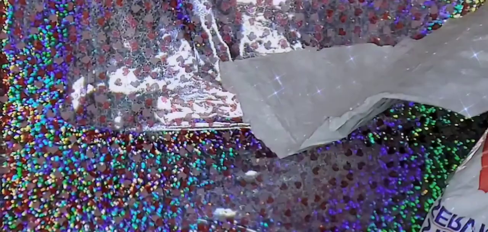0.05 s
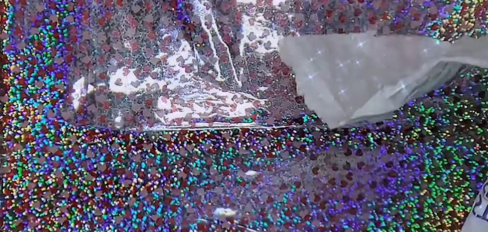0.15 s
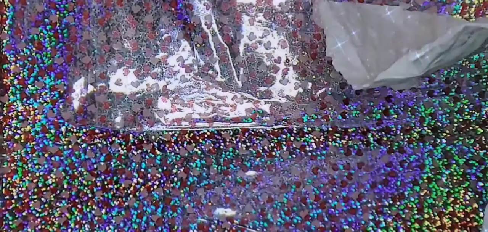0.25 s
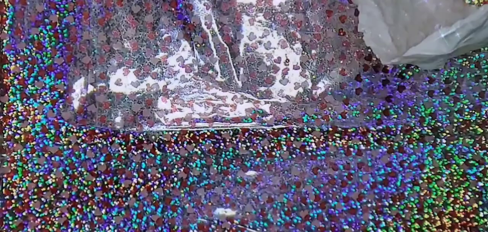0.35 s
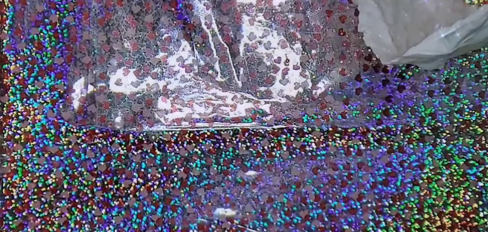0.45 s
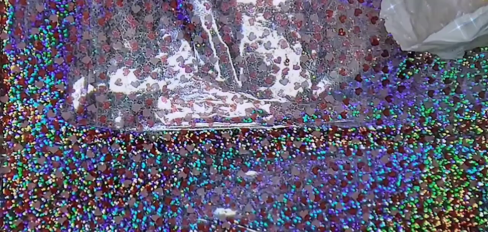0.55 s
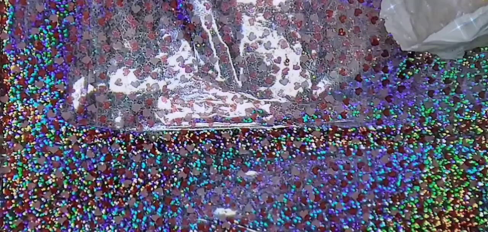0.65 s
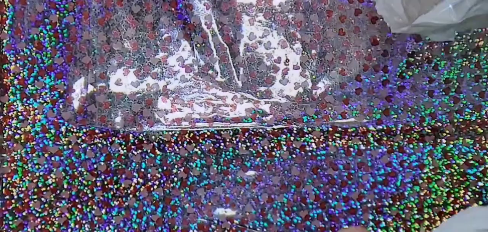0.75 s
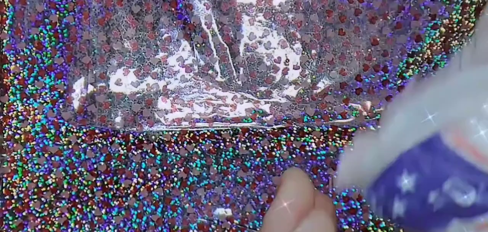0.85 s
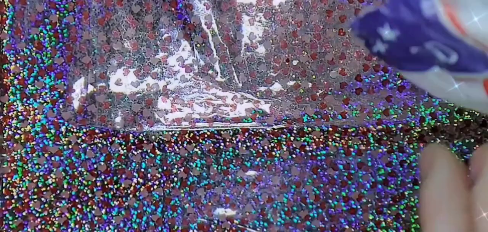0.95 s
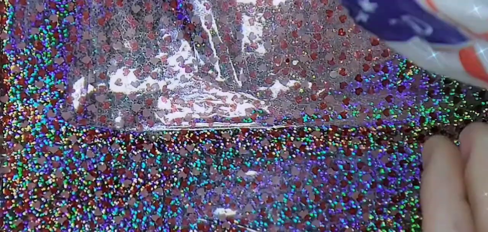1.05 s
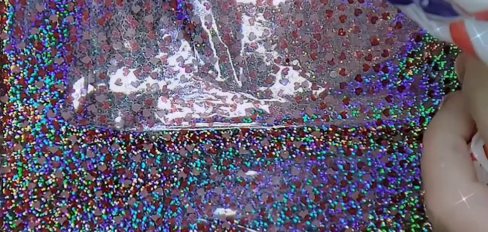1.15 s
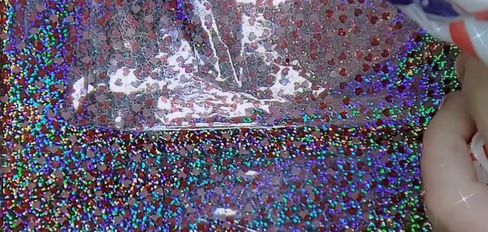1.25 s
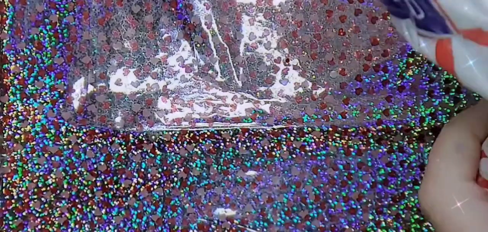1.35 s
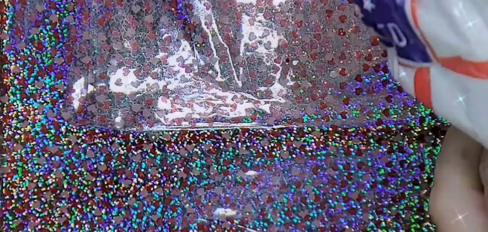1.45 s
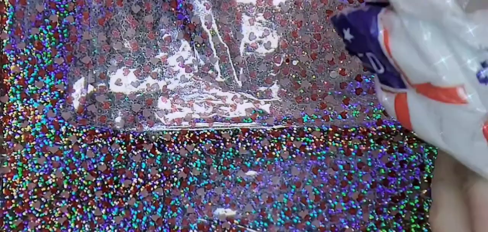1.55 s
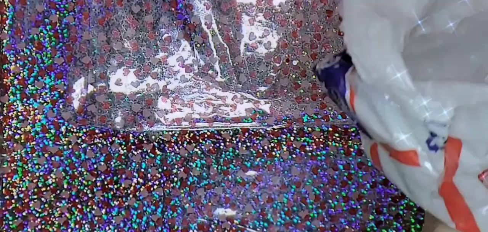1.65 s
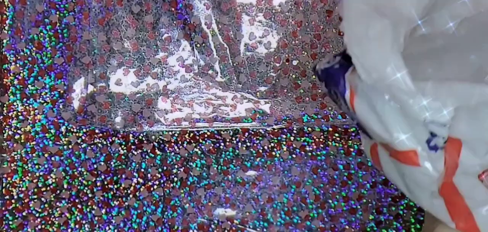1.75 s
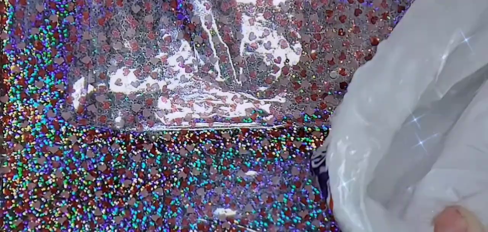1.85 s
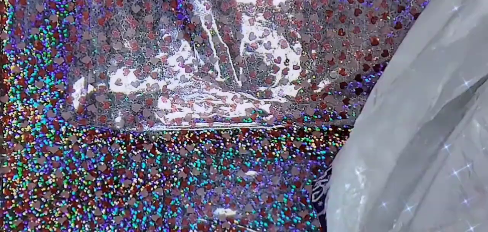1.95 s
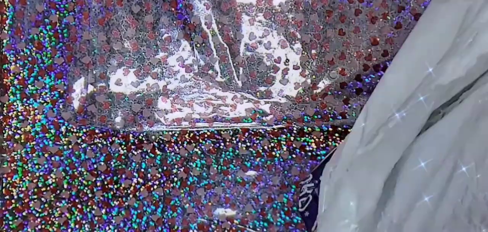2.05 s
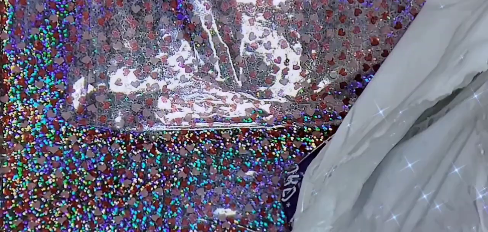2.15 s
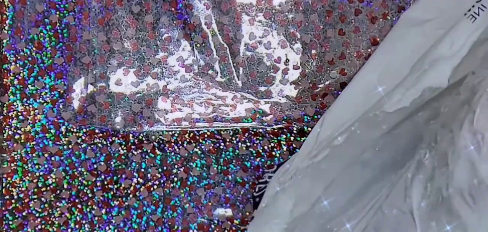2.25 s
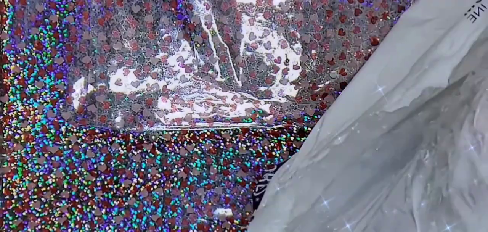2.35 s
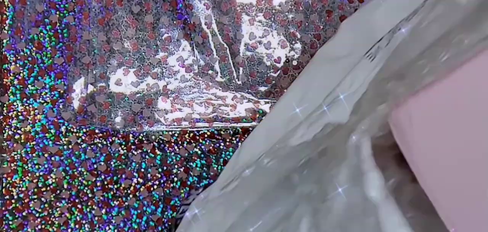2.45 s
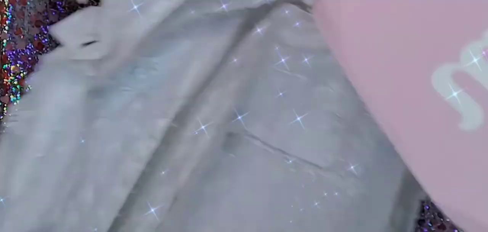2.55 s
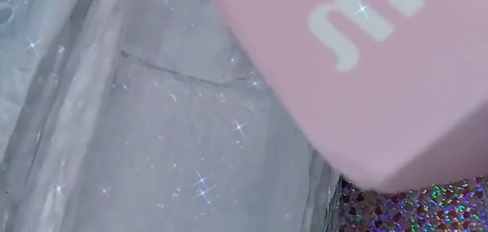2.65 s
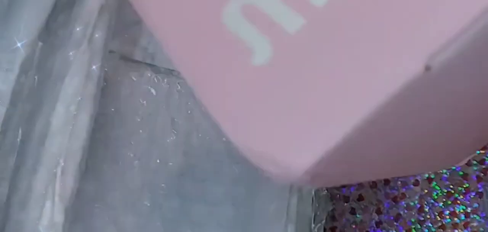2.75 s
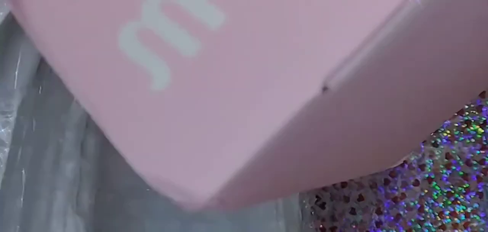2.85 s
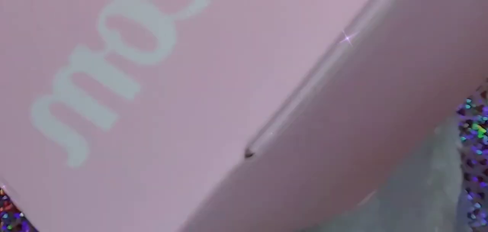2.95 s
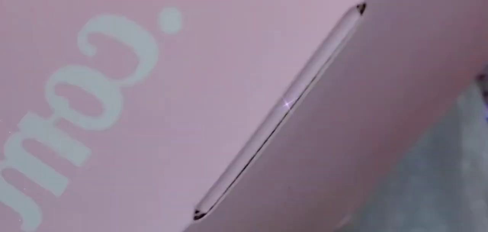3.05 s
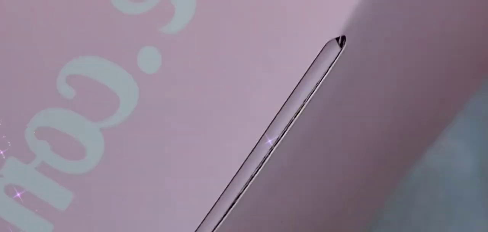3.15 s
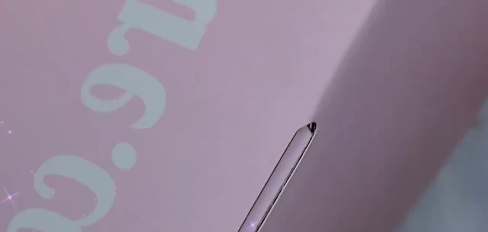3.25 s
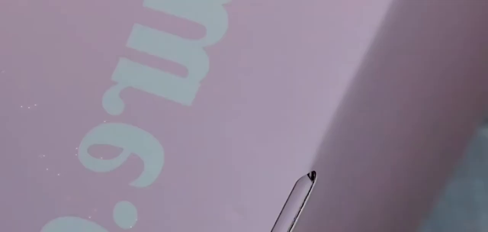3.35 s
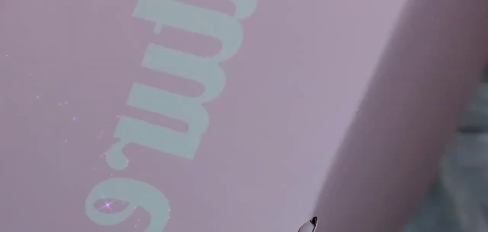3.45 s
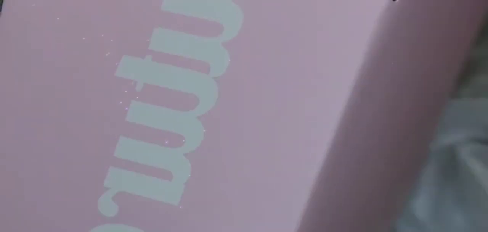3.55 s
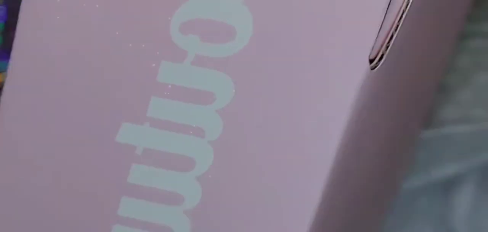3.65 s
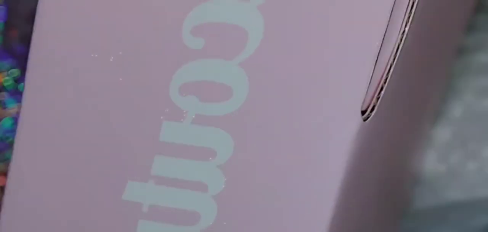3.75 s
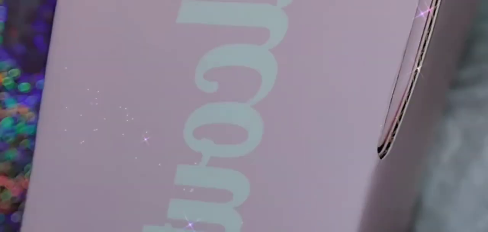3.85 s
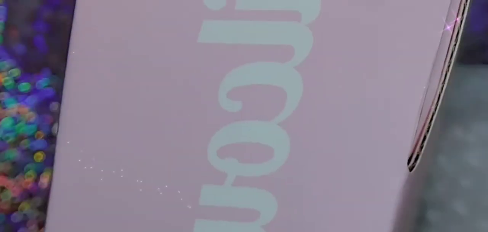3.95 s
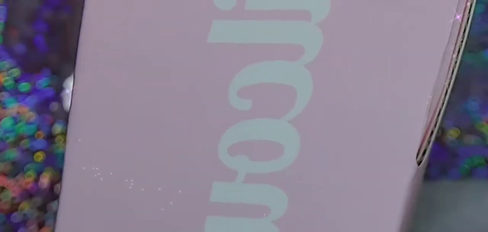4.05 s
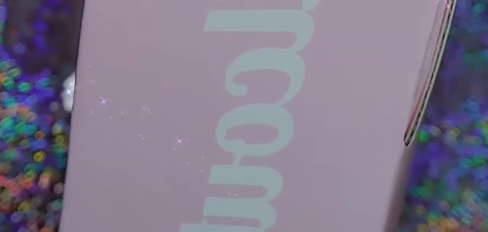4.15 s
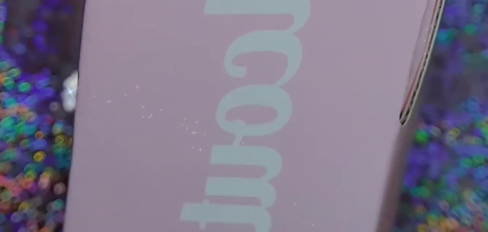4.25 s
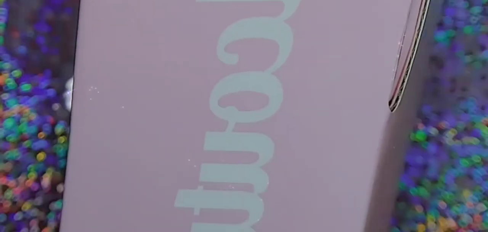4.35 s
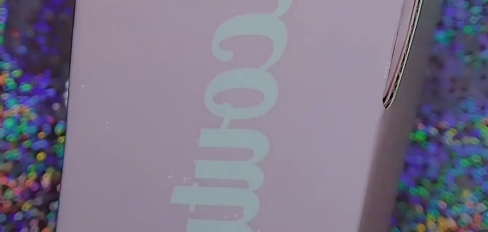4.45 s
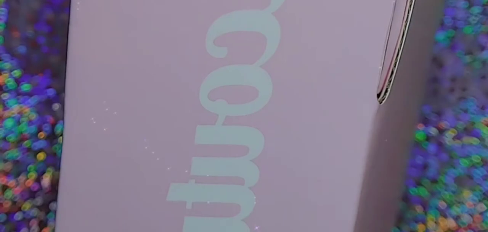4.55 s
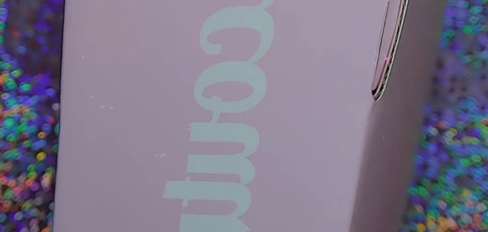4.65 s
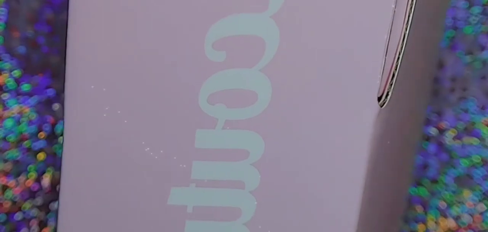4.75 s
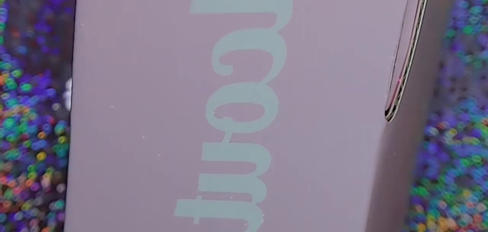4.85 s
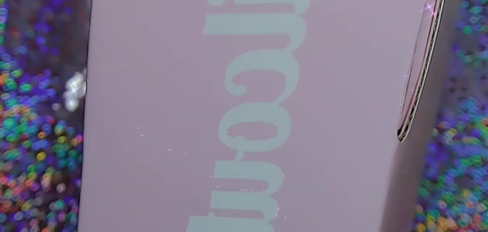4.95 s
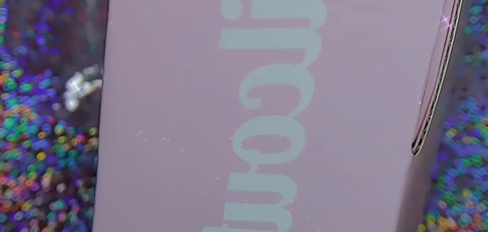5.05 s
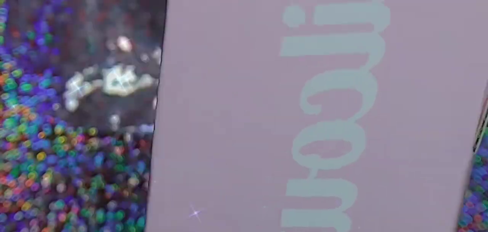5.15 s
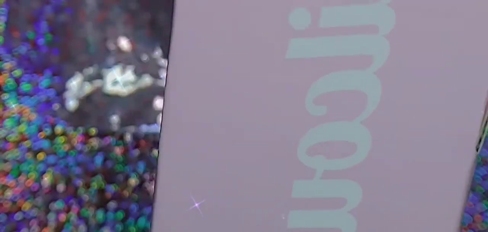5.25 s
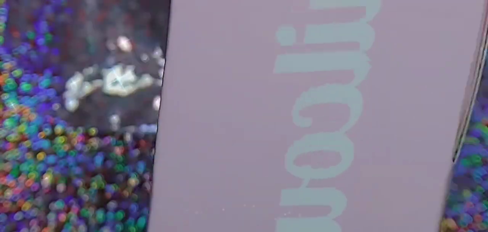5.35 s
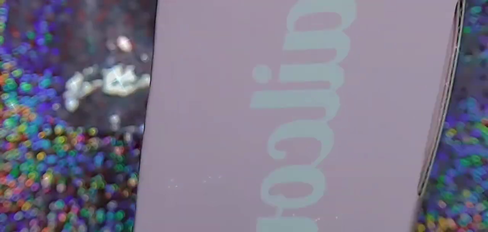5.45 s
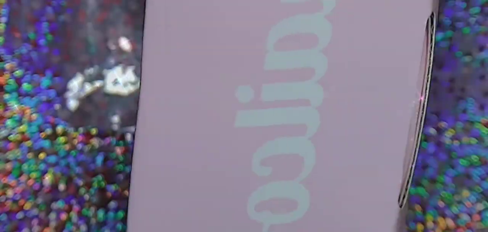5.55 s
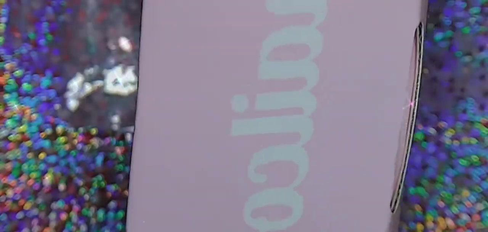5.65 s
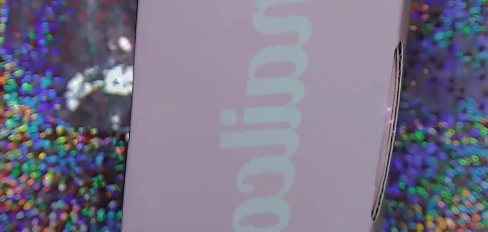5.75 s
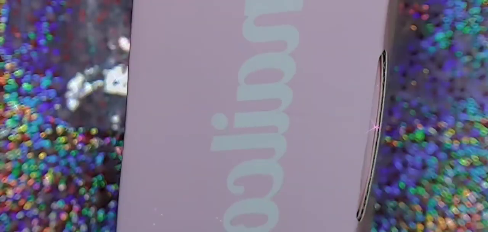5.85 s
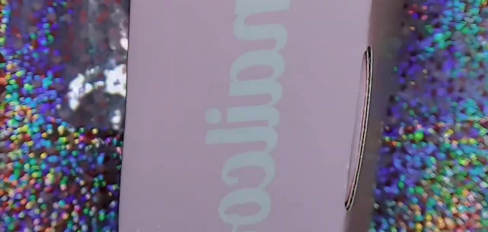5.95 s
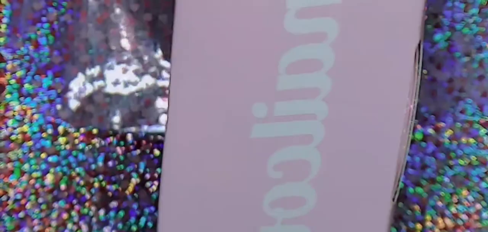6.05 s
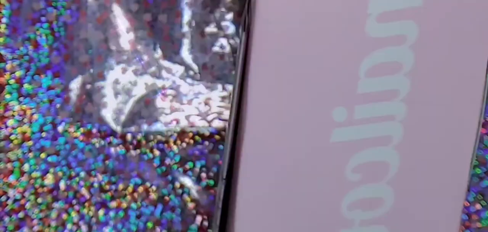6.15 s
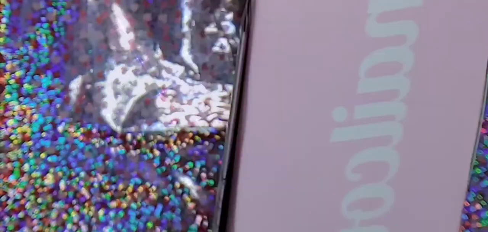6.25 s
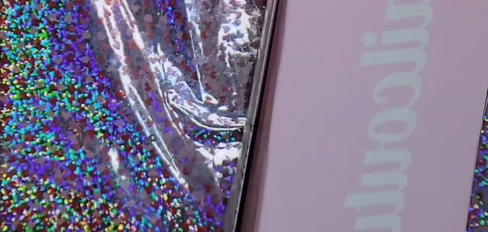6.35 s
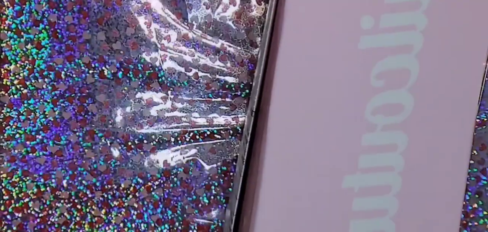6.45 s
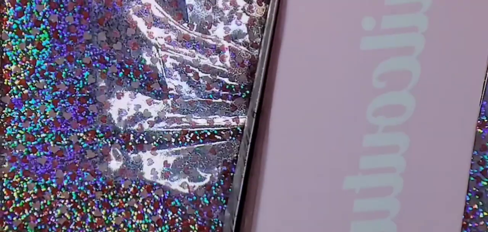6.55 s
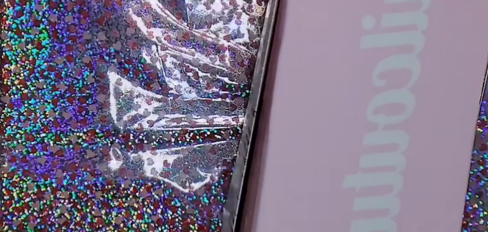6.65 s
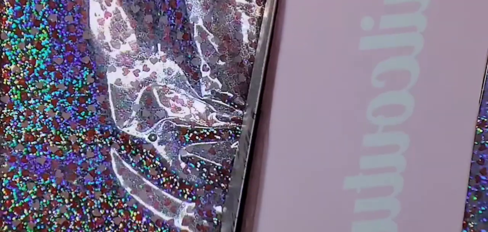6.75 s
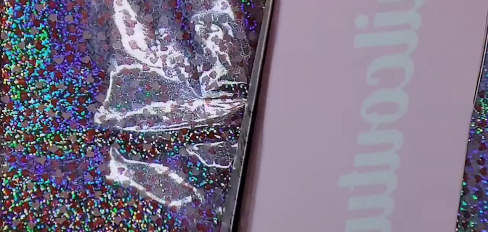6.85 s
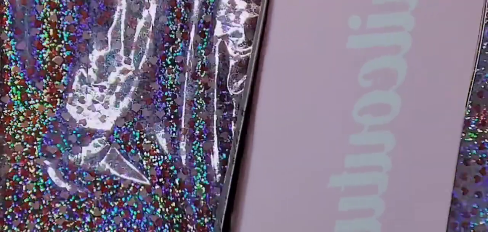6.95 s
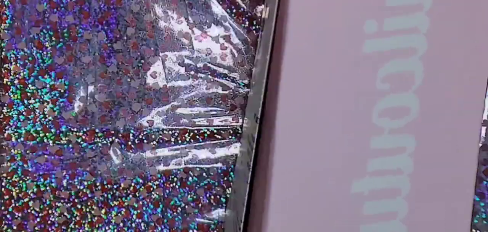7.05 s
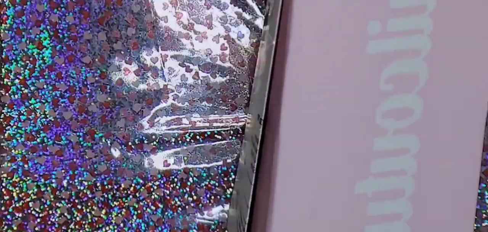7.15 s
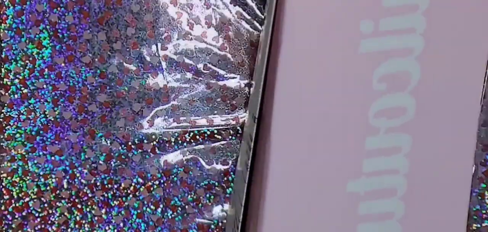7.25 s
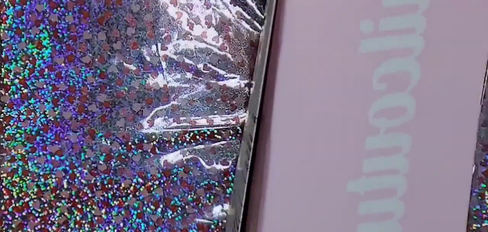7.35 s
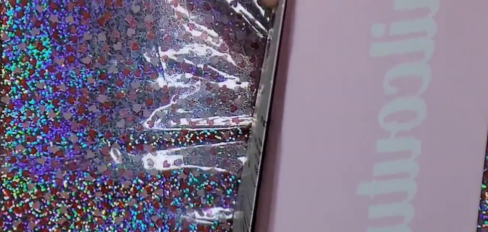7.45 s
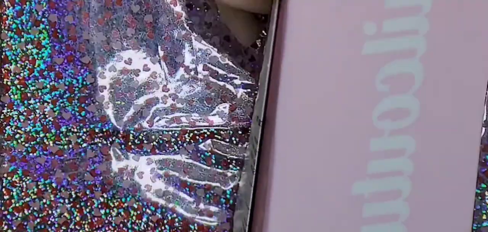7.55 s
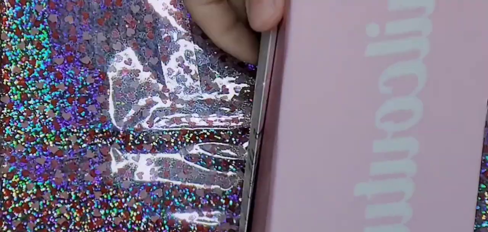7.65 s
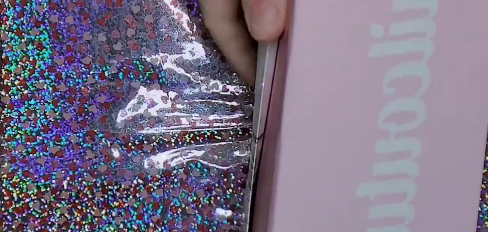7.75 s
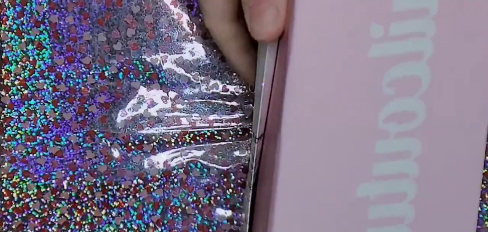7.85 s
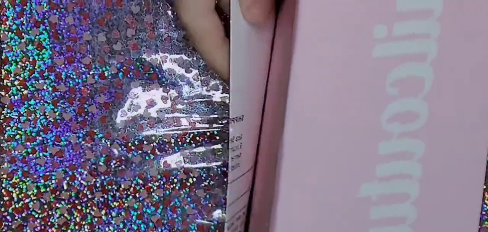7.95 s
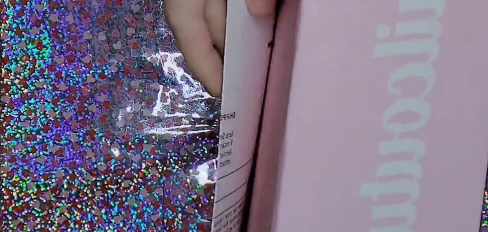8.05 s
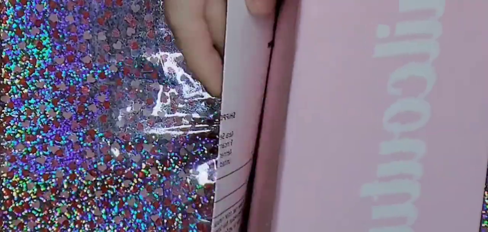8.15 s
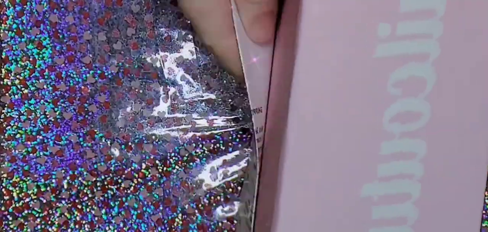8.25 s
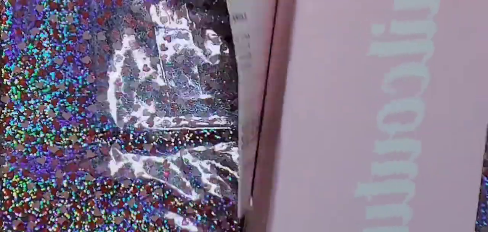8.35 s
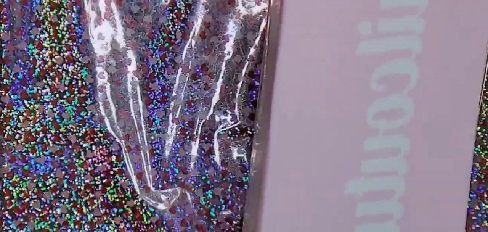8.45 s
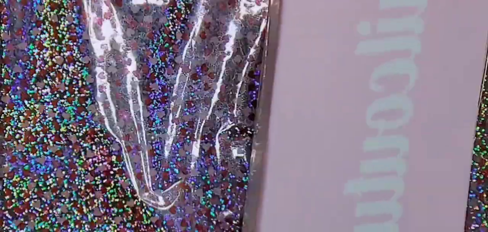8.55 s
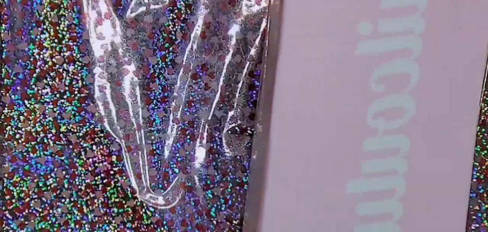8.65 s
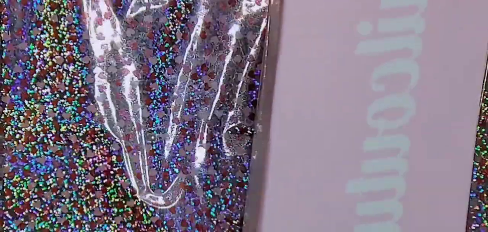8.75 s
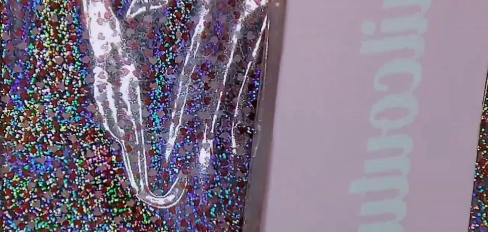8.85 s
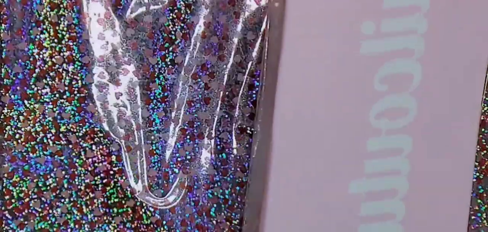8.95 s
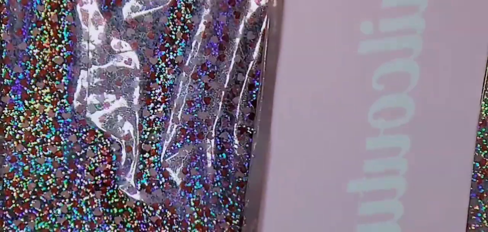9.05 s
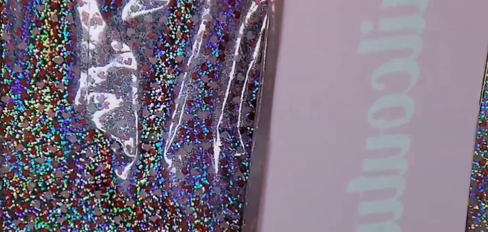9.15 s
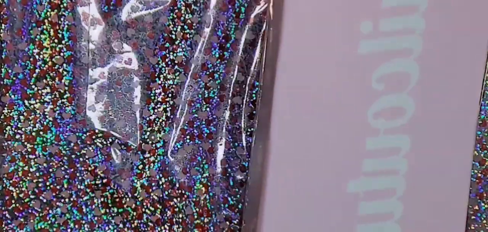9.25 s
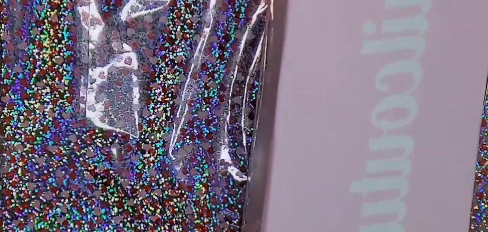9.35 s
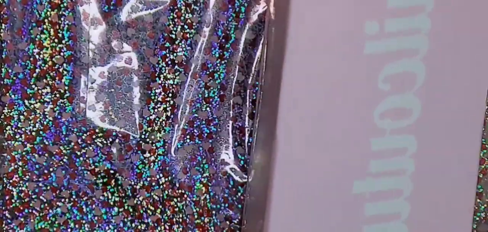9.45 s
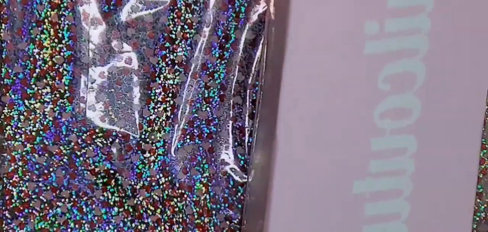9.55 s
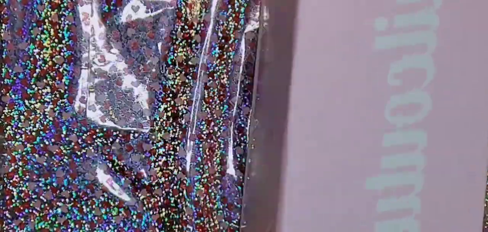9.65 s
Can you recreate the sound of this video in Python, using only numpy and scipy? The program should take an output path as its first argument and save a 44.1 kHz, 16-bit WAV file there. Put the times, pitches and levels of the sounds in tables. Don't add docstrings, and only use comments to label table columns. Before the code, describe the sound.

Dense, sharp crackling of a plastic bag being ripped open gives way to soft cardboard scuffs, dull hollow taps and tiny film ticks.

```python
import sys
import numpy as np
from scipy import signal
from scipy.fft import rfft, irfft, next_fast_len
from scipy.io import wavfile
from scipy.ndimage import uniform_filter1d

SR = 44100
rng = np.random.default_rng(int(sys.argv[2]) if len(sys.argv) > 2 else 0)


def unload_audio(sound):
    columns = np.transpose(np.atleast_2d(sound))
    steps = np.round(np.clip(columns, -1, 1) * 32767)
    wavfile.write(sys.argv[1], SR, steps.astype(np.int16))


def makeup_ratio(level_db):
    decades = np.asarray(level_db, float) / 20
    return 10 ** decades


N = 427318
LEAD_S = 0.002
LET_GO_S, LET_GO_DB_PER_S = 4.38, 130
REST_DB = -81
HISS_DB = -80

# peak in seconds, effort in dB, seconds to rise the last 10 dB,
# seconds to fall 10 dB, weight in dB (more weight, more low sound).
SQUEEZES = [(0.04, -39.0, 0.076, 0.548, -9.0), (0.21, -37.0, 0.287, 0.288, -13.0),
            (0.419, -39.5, 0.15, 0.175, -18.0), (0.539, -39.0, 0.108, 0.058, -5.0),
            (0.678, -43.5, 0.518, 0.043, -6.0), (0.798, -43.5, 0.065, 0.047, -7.5),
            (0.909, -33.5, 0.11, 0.084, -16.0), (1.038, -42.5, 0.069, 0.093, -9.5),
            (1.207, -43.0, 0.184, 0.576, -17.0), (1.347, -37.0, 0.388, 0.386, -13.0),
            (1.492, -35.5, 0.066, 0.18, -17.0), (1.687, -36.0, 0.016, 0.9, -17.0),
            (1.901, -30.0, 0.112, 0.276, -12.0), (2.056, -29.0, 0.017, 0.045, -1.0),
            (2.135, -37.0, 0.249, 0.173, -10.0), (2.266, -28.5, 0.064, 0.114, -14.0),
            (2.565, -31.0, 0.12, 0.19, -9.0), (2.819, -36.0, 0.037, 0.111, -8.5),
            (2.984, -34.0, 0.022, 0.043, -11.0), (3.093, -37.0, 0.036, 0.3, -14.0),
            (3.163, -31.5, 0.2, 0.019, -9.0), (3.221, -32.5, 0.041, 0.044, -3.0),
            (3.487, -36.0, 0.17, 0.158, -0.5), (3.722, -32.0, 0.317, 0.712, -12.0)]
# peak in seconds, rumble in dB,
# seconds to rise 10 dB, seconds to fall 10 dB.
SHOVES = [(.55, -66, .05, .2), (.909, -62, .06, .3), (1.048, -53, .05, .04), (1.317, -54, .04, .13),
          (1.896, -59, .05, .2), (2.035, -49, .14, .08), (2.276, -50.5, .15, .045), (2.56, -42.5, .03, .11),
          (2.824, -48, .02, .05), (3.043, -47, .04, .3), (3.462, -36, .03, .085), (3.712, -49, .11, .7),
          (3.961, -47.5, .6, .45)]
# time in seconds,
# peak in dB, pitch in Hz, bright tick in dB.
SNAPS = [(.0676, -11, 1070, -36), (.0769, -9.5, 4780, -35), (.1334, -14, 4478, -28),
         (.205, -19.5, 1765, -43), (.2209, 0, 4260, -32.5), (.2533, -6, 3170, -31),
         (.3254, -14.5, 2971, -48), (.3634, -6, 4050, -34), (.3695, -3, 1830, -31),
         (.5152, -16.5, 2300, -33), (.529, -23, 2024, -33), (.5404, -14, 3703, -40),
         (.638, -11, 5200, -40), (.6761, -11.5, 6589, -28), (.8153, -10, 3430, -22.5),
         (.8275, -12.5, 6890, -27), (.906, -12, 1340, -26), (1.2523, -14, 3420, -45),
         (1.3553, -10.5, 5440, -32), (1.4139, -10, 4565, -38), (1.4914, -9, 5000, -20.8),
         (1.4982, -15, 4300, -39), (1.5141, -16, 1580, -35), (1.5753, -10.5, 1710, -31),
         (1.5842, -10.5, 4866, -31.5), (1.6892, -8.5, 6800, -37), (1.7614, -10.5, 4730, -26),
         (1.7667, -16.9, 3380, -28),
         (1.8604, -12, 1600, -32), (1.8749, -5, 6029, -30.5), (1.8926, -1.5, 7500, -21),
           (1.9026, -11.5, 1765, -23), (1.9144, -7, 2600, -37), (1.9296, -6, 4560, -29.5),
           (1.9575, -7, 2370, -20), (1.9615, -3, 7019, -23.5), (1.9681, -10, 3100, -32),
           (2.0561, -3, 1640, -26), (2.067, -7, 3320, -25), (2.243, -6, 5700, -22),
           (2.2646, -7.5, 4392, -37), (2.285, -14, 5700, -36), (2.585, -8, 6933, -19),
           (2.7551, -14, 5124, -33.5), (3.2202, -18, 1520, -40), (3.4559, -12.5, 1636, -18.5),
           (3.5535, -14, 7751, -29), (3.7144, -13, 4134, -20), (3.7672, -11, 4350, -27),
           (3.7834, -8, 4823, -21), (3.8005, -11, 2540, -28), (3.855, -10, 4700, -27),
           (3.8806, -10, 7321, -22.7), (3.9228, -9, 3700, -23), (4.022, -11, 2600, -25),
           (4.1043, -13, 1500, -26), (4.1521, -9, 5500, -33)]
# time in seconds, peak in dB, pitch in Hz, bright tick in dB.
SETTLING = [(4.3196, -22, 1920, -39), (4.4218, -32, 4180, -52), (4.8075, -30, 6250, -44),
            (4.9297, -27, 2470, -42), (4.9696, -30, 2420, -52), (5.1665, -34, 3670, -49),
            (5.1981, -38, 3760, -57), (5.2205, -39, 5840, -57), (5.4973, -44, 10400, -56),
            (5.6535, -41, 4330, -54), (6.5095, -33, 3760, -48), (6.764, -41, 7380, -44),
            (8.5455, -27, 3500, -55), (8.5462, -28, 1300, -60), (8.6195, -25, 1550, -66),
            (9.0822, -43, 5000, -52), (9.1391, -37, 7220, -43), (9.3085, -46, 4400, -60),
            (9.5208, -46, 4440, -56), (9.5655, -41, 4720, -68)]
# time in seconds, peak in dB, pitch in Hz,
# bright tick in dB.
CREASES = [(0.0498, -19, 3400, -40), (0.1804, -22, 12000, -38), (0.1979, -19, 1830, -50),
           (0.4476, -19, 6630, -38), (0.6085, -27, 3140, -38), (0.7913, -27, 4460, -37),
           (0.8549, -19, 11930, -40), (0.9845, -28, 3400, -37), (1.1641, -22, 8030, -46),
           (1.1894, -20, 7210, -50), (1.2841, -26, 2520, -38), (1.3867, -18, 3680, -42),
           (1.4694, -19, 4090, -32), (1.6518, -23, 5730, -41), (1.7451, -21, 3100, -35),
           (1.8396, -19, 5230, -33), (1.9877, -16, 2910, -36), (2.0424, -16, 4330, -33),
           (2.1005, -19, 4010, -39), (2.1316, -22, 1960, -34), (2.2236, -17, 7260, -46),
           (2.3165, -18, 3080, -29), (2.3507, -21, 12000, -41), (2.3741, -18, 3770, -31),
           (2.4063, -23, 4050, -44), (2.4588, -26, 2200, -38), (2.5369, -10, 12000, -31),
           (2.6049, -18, 1250, -27), (2.6308, -19, 2820, -35), (2.6915, -16, 7320, -43),
           (2.7436, -17, 7430, -42), (2.8202, -21, 3510, -47), (2.9887, -24, 1160, -35),
           (3.078, -26, 11480, -43), (3.1022, -19, 5190, -37), (3.1322, -17, 4220, -34),
           (3.1954, -25, 1870, -43), (3.3562, -17, 5560, -41), (3.5407, -16, 4090, -31),
           (3.5907, -16, 3510, -41), (3.6079, -16, 11710, -35), (3.6698, -15, 11480, -33),
           (3.6964, -11, 12000, -30), (3.7297, -16, 2580, -38), (3.8197, -14, 4670, -32),
           (3.8708, -18, 2150, -28), (3.9106, -16, 11390, -36), (3.9329, -21, 1590, -31),
           (4.2105, -37, 1510, -49), (4.2609, -34, 1270, -48)]
# time in seconds, peak in dB, pitch in Hz,
# bright tick in dB.
TICKS = [(4.544, -35, 12000, -54), (4.5902, -41, 12000, -56), (4.6485, -36, 6310, -58),
         (4.714, -31, 6610, -43), (4.7542, -26, 4840, -50), (4.9471, -22, 7490, -45),
         (5.0399, -36, 5020, -49), (5.0637, -39, 7170, -60), (5.0787, -33, 7560, -52),
         (5.1233, -38, 6980, -50), (5.2344, -39, 1250, -57), (5.3042, -49, 5000, -58),
         (5.4051, -45, 4220, -64), (5.8716, -51, 7450, -69), (5.9045, -52, 7130, -67),
         (5.9256, -50, 7470, -66), (5.959, -44, 7040, -65), (6.0009, -49, 1160, -55),
         (6.0544, -33, 1230, -55), (6.206, -40, 12000, -60), (6.2759, -41, 12000, -62),
         (6.2971, -39, 4890, -58), (6.3227, -38, 5560, -48), (6.4036, -47, 4970, -61),
         (6.4156, -38, 3960, -67), (6.4528, -40, 11860, -59), (6.4858, -38, 2860, -55),
         (6.5144, -27, 1570, -62), (6.5288, -27, 6090, -41), (6.5379, -30, 1120, -42),
         (6.6718, -44, 5560, -65), (6.698, -40, 12000, -61), (6.8195, -47, 1380, -59),
         (6.8619, -37, 11460, -57), (6.9791, -31, 1120, -36), (7.0311, -32, 1160, -40),
         (7.084, -22, 12000, -41), (7.1018, -27, 7320, -47), (7.1337, -30, 7110, -50),
         (7.1908, -32, 6800, -53), (8.0608, -35, 4240, -48), (8.0719, -33, 4480, -45),
         (8.3585, -41, 4780, -58), (8.4535, -31, 4390, -41), (8.6567, -42, 3660, -67),
         (9.042, -44, 4650, -61), (9.0945, -44, 7710, -64), (9.1955, -49, 2170, -56),
         (9.4005, -48, 5400, -68), (9.6619, -41, 4370, -60)]
# time in seconds, peak in dB, pitch in Hz.
BUMPS = [(0.36, -18, 1000), (1.687, -29.5, 517), (1.952, -9.5, 593), (2.051, -21, 415), (2.269, -28.5, 520),
         (2.298, -15.5, 606), (2.519, -22.5, 360), (3.226, -17, 420), (3.453, -12, 480), (3.609, -22, 403),
         (4.419, -26, 840)]
# frequency in Hz, level in dB per Hz.
FILM_COLOUR = [(18, -49.5), (30, -20), (70, -13), (184, -5), (600, -2), (801, -3), (1760, -4), (2170, -6),
               (7470, -4), (8980, -11.5), (12000, -5.5), (16000, -10)]
# offset in dB, share of the effort, share of the weight,
# steepness (how many times faster it rises and falls).
FILM_LAW = [
    (-0.3, 1.0, 0.0, 1.0),
    (-4.6, 1.06, 0.05, 1.15),
    (-3.0, 1.06, 0.2, 1.3),
    (3.0, 1.09, 0.85, 1.42),
]
SPLITS_HZ = 3300, 1500, 500, 110

# peak in seconds, effort
# in dB, seconds to rise 10 dB, seconds to fall 10 dB, weight in dB.
STROKES = [(4.47, -55.5, 0.02, 0.9, -8.0), (4.749, -43.5, 0.08, 0.24, -12.0),
           (4.975, -50.5, 0.249, 0.35, -10.0), (5.32, -55.0, 0.006, 0.1, 1.0),
           (5.657, -64.0, 0.008, 0.04, -25.0), (5.955, -68.5, 0.266, 0.072, -3.0),
           (5.988, -57.5, 0.006, 0.12, 10.0), (6.205, -69.0, 0.02, 0.2, 2.0),
           (6.32, -52.0, 0.045, 0.028, -11.0), (6.49, -51.0, 0.08, 0.04, -13.0),
           (6.513, -45.5, 0.004, 0.3, -2.0), (6.544, -46.5, 0.1, 0.03, -1.0),
           (6.85, -58.0, 0.33, 0.049, -13.0),
           (6.93, -50.0, 0.004, 0.432, 2.0), (6.999, -43.5, 0.075, 0.13, -2.0),
           (7.154, -46.5, 0.622, 0.084, -8.0), (7.368, -51.5, 0.188, 0.049, -5.0),
           (7.63, -63.0, 0.288, 0.36, 6.0), (7.737, -54.5, 0.066, 0.173, 3.0),
           (8.042, -50.5, 0.1, 0.09, -16.0), (8.072, -40.0, 0.016, 0.104, -27.0),
           (8.112, -47.0, 0.05, 0.045, -7.0), (8.316, -50.0, 0.08, 0.05, -16.0),
           (8.39, -41.0, 0.04, 0.5, -27.0), (8.556, -41.0, 0.012, 0.04, -10.0),
           (8.624, -55.0, 0.006, 0.16, 5.0), (8.91, -60.5, 0.015, 0.241, 0.0),
           (9.169, -60.0, 0.896, 0.173, -11.5), (9.354, -68.0, 0.042, 0.08, -2.0),
           (9.528, -65.0, 0.008, 0.518, -17.0), (9.658, -63.0, 0.07, 0.158, 5.0)]
# peak in seconds, rumble in dB, seconds to rise 10 dB,
# seconds to fall 10 dB.
NUDGES = [(4.47, -65, .02, .05), (4.969, -76, .6, .6), (5.988, -56, .006, .13), (6.525, -41, .012, .05),
          (7.03, -50, .08, .05), (7.174, -61, .2, .09), (7.742, -57, .03, .07), (8.112, -59.7, .04, .03),
          (8.66, -60, .02, .07)]
# time in seconds, peak in dB, pitch in Hz,
# bright tick in dB, hollow knock in dB.
TAPS = [(4.893, -27, 1580, -53.5, -61), (4.944, -32, 635, -50, -49), (5.232, -37, 1090, -50.5, -46),
        (5.321, -23.5, 860, -48, -29), (5.768, -45, 1220, -53.5, -82), (5.985, -53, 751, -48, -29.5),
        (6.052, -24, 635, -57, -31), (6.5125, -26, 900, -50, -32), (6.927, -26, 1090, -44, -40),
        (7.501, -45, 600, -66, -49), (7.717, -37, 956, -63.5, -38.5), (8.319, -40, 500, -60, -55),
        (8.5442, -25, 650, -52, -37), (8.6185, -14.5, 750, -64, -33), (9.048, -40, 564, -72, -41.5),
        (9.228, -50, 1000, -68, -49.5), (9.66, -41, 600, -61, -54)]
# frequency in Hz, level in dB, seconds to die by 60 dB.
BOX_MODES = [(155, -8, 0.048), (280.6, -3, 0.06), (434, 3, 0.04), (560, 3, 0.03), (700, -1, 0.02),
             (1056, -6, 0.02), (1540, -3, .02)]
# frequency in Hz, level in dB per Hz.
CARD_COLOUR = [(18, -41), (40, -8), (124, -5.5), (210, 1.5), (620, -6.5), (1220, -7.5), (2900, -18),
               (3800, -12), (7500, -9.5), (9000, -19), (11500, -10), (15500, -15)]
# offset in dB, share of the effort, share of the weight,
# steepness (how many times faster it rises and falls).
CARD_LAW = [
    (-0.5, 1.0, 0.0, 1.0),
    (8.0, 1.27, 0.45, 1.2),
    (5.0, 1.19, 0.55, 1.36),
    (2.2, 1.01, 0.9, 1.2),
]

SQUEAK_S = 7.33, 9.30, 5.768, 2.972
# length in seconds, pitch in Hz, width in Hz, level in dB.
SQUEAKS = [
    (0.11, 465, 90, -46.5),
    (0.15, 1800, 80, -68),
    (0.077, 1330, 280, -66),
    (0.08, 900, 240, -39),
]

# frequency in Hz, seconds to die by 60 dB.
ROOM = [(150, 0.22), (600, 0.38), (3000, 0.12), (12000, 0.18)]
# frequency in Hz, level in dB per Hz.
HISS_COLOUR = [(30, -11.5), (90, -2.5), (345, -8), (1500, -24), (2800, -31), (4500, -26), (8980, -27.5),
               (16000, -19.5)]


def mailer():
    rustle = patchy(crackle(1100, 3.6, 0.75, -3.5, 2.8), 1.6)
    out = played(coloured(rustle, FILM_COLOUR), SQUEEZES, FILM_LAW, SHOVES)
    since_let_go = np.maximum(np.arange(N) / SR - LET_GO_S, 0)
    out = out * makeup_ratio(-LET_GO_DB_PER_S * since_let_go)
    snaps = SNAPS
    snaps += [(s, db - 1.5, hz, tick_db + 6) for s, db, hz, tick_db in SETTLING]
    snaps += [(s, db + 0.6, hz, tick_db + 2.5) for s, db, hz, tick_db in CREASES + TICKS]
    chance = rng.standard_normal((len(snaps), 900))
    for (s, db, hz, tick_db), row in zip(snaps, chance):
        cycles = 0.98 if s < LET_GO_S else 1.7
        add(out, s - LEAD_S, snap(db, hz, tick_db, cycles, 0.0012, row))
    for s, db, hz in BUMPS:
        add(out, s + 0.004, makeup_ratio(db) * buckle(hz, 1.5, np.arange(1500) / SR))
    return out


def crackle(per_s, spread_db, clump, smooth_db, flicker_db, count=14):
    rate = per_s * np.exp(clump * slow(40))
    size = makeup_ratio(spread_db * np.minimum(rng.exponential(1, N), 4.5)) * (rng.random(N) < rate / SR)
    size *= rng.choice([-1.0, 1.0], N)
    kind = rng.integers(0, count, N)
    t = np.arange(300) / SR
    buckles = np.zeros(N)
    for k, hz in enumerate(np.geomspace(380, 13000, count)):
        tick = rng.standard_normal(len(t)) * np.exp(-t / 0.00036)
        grain = evened(buckle(hz, 1.91, t)) + 1.3 * evened(tick)
        at = np.flatnonzero(size * (kind == k))
        places = (at[:, None] + np.arange(len(t))).ravel()
        buckles += np.bincount(places, np.outer(size[at], grain).ravel(), N + len(t))[:N]
    friction = rng.standard_normal(N) * makeup_ratio(flicker_db * slow(21))
    both = evened(buckles) + makeup_ratio(smooth_db) * evened(friction)
    power = uniform_filter1d(uniform_filter1d(both ** 2, size=1800), size=1800)
    return both / abs(power) ** 0.4


def snap(db, hz, tick_db, cycles, tick_s, chance):
    t = np.arange(len(chance)) / SR - LEAD_S
    spray = np.diff(chance, prepend=0) * np.exp(np.minimum(t / 0.00055, -t / tick_s))
    swing = buckle(hz, cycles, np.maximum(t + 0.39 / hz, 0))
    sound = makeup_ratio(db + 0.5) * swing + makeup_ratio(tick_db + 1.5) * spray
    return sound - 0.21 * np.roll(sound, round(0.0013 * SR))


def buckle(hz, cycles, t):
    return np.sin(2 * np.pi * hz * t) * np.exp(-t * hz / cycles) * (1 - np.exp(-t * hz * 6))


def played(z, strokes, law, loads):
    size = next_fast_len(N)
    hz = np.fft.rfftfreq(size, 1 / SR)
    under = [1 + 0 * hz] + [1 / (1 + (hz / f) ** 12) for f in SPLITS_HZ] + [0 * hz]
    s, effort_db, rise, fall, weight_db = np.transpose(strokes)
    gains = []
    for offset_db, effort_share, weight_share, steep in law:
        db = offset_db + effort_share * effort_db + weight_share * weight_db
        gains.append(stroked(s, db, rise / steep, fall / steep))
    gains.append(stroked(*np.transpose(loads), REST_DB))
    out = np.zeros(N)
    for upper, lower, gain in zip(under, under[1:], gains):
        band = irfft(z * np.sqrt(abs(upper - lower)), size)[:N]
        out += gain * evened(band)
    return out


def stroked(s, db, rise, fall, rest_db=-200):
    t = np.arange(0, N + 32, 32) / SR
    s, db, rise, fall = (np.concatenate([v[:1], v, v[-1:]]) for v in (s, db, rise, fall))
    k = np.searchsorted(s[1:-1], t)
    dying = np.where(t >= s[k], db[k] - 10 * (t - s[k]) / fall[k], rest_db)
    swelling = np.where(t <= s[k + 1], db[k + 1] - 10 * (s[k + 1] - t) / rise[k + 1], rest_db)
    level_db = np.maximum(np.maximum(dying, swelling), rest_db)
    return np.interp(np.arange(N) / SR, t, makeup_ratio(level_db))


def patchy(x, depth_db):
    z = signal.stft(x, SR, nperseg=256)[2]
    blotches = uniform_filter1d(rng.standard_normal(z.shape), size=9, axis=0)
    blotches = uniform_filter1d(blotches, size=24, axis=1)
    return signal.istft(z * makeup_ratio(depth_db * evened(blotches)), SR, nperseg=256)[1][:N]


def coloured(x, colour):
    size = next_fast_len(N)
    z = rfft(x, size)
    mean = np.sqrt(uniform_filter1d(abs(z) ** 2, size=601))
    return z / mean * makeup_ratio(read(colour, np.fft.rfftfreq(size, 1 / SR)))


def slow(rate):
    return evened(signal.lfilter([1], [1, -np.exp(-2 * np.pi * rate / SR)], rng.standard_normal(N)))


def evened(x):
    return x / np.sqrt(np.mean(x ** 2) + 1e-20)


def read(points, hz):
    f, value = np.transpose(points)
    return np.interp(np.log(hz + 1), np.log(f + 1), value)


def add(mix, s, sound):
    part = mix[round(s * SR):][:len(sound)]
    part += sound[:len(part)]


def box():
    rubbing = patchy(crackle(400, 2.1, 0.9, 5, 2), 1.9)
    out = played(coloured(rubbing, CARD_COLOUR), STROKES, CARD_LAW, NUDGES)
    chance = rng.standard_normal((len(TAPS), 4000))
    t = np.arange(4000) / SR
    soft = 1 - np.exp(-t / 0.00093)
    for (s, db, hz, tick_db, knock_db), row in zip(TAPS, chance):
        ring = np.zeros(len(t))
        for k, (f, mode_db, t60) in enumerate(BOX_MODES):
            fading = makeup_ratio(mode_db + 2.6 * row[k] - 60 * t / t60)
            ring += fading * np.sin(2 * np.pi * f * (1 + 0.13 * row[-k - 1]) * t)
        add(out, s + 0.0015 - LEAD_S, snap(db, hz, tick_db, 1.35, 0.0012, row))
        add(out, s + 0.0012, makeup_ratio(knock_db - 8.5) * ring * soft)
    return out


def squeaks():
    out = np.zeros(N)
    for s, (length, hz, width, db) in zip(SQUEAK_S, SQUEAKS):
        t = np.arange(0, length, 1 / SR)
        drag = signal.lfilter(*signal.iirpeak(hz, hz / width, SR), rng.standard_normal(8000))[:len(t)]
        add(out, s, makeup_ratio(db) * evened(drag) * np.sin(np.pi * np.sqrt(t / length)) ** 2)
    return out


def room(x):
    out = np.zeros(N)
    turn = 2 * np.pi * 1.5 * np.arange(N) / SR
    at = np.arange(200, SR // 3 - 20, 20)
    for k in range(3):
        echoes = np.zeros(SR // 3)
        echoes[at + rng.integers(0, 20, len(at))] = rng.choice([-1.0, 1.0], len(at))
        hz, t, z = signal.stft(echoes, SR, nperseg=256)
        tail = signal.istft(z * makeup_ratio(-60 * t / read(ROOM, hz)[:, None]), SR, nperseg=256)[1]
        share = np.sqrt(2 / 3) * np.cos(turn + k * 2 * np.pi / 3)
        out += signal.oaconvolve(x * share, tail / np.linalg.norm(tail))[:N]
    return out


def hiss():
    noise = coloured(rng.standard_normal(N), HISS_COLOUR)
    return makeup_ratio(HISS_DB) * evened(irfft(noise, next_fast_len(N))[:N])


def scene():
    near = mailer() + box() + squeaks()
    mono = near + makeup_ratio(-14.5) * room(near) + hiss()
    return np.array([mono, mono])


def filled(x, loud_share, quiet_db, apart_db):
    hz, t, z = signal.stft(x, SR, nperseg=128)
    blocks = len(t) // 16 + 1
    middle = np.minimum(np.arange(blocks) * 1024, N - 1)
    power_db = 10 * np.log10(abs(uniform_filter1d(x ** 2, size=4096))[middle] + 1e-12)
    runs = evened(uniform_filter1d(rng.standard_normal(blocks), size=2))
    on = (runs > loud_share) | ((power_db < quiet_db) & (runs > -1.6))
    bands = np.repeat(rng.random((22, blocks)) < 0.75, 3, 0)[:len(hz)]
    bands = bands & (hz > 4644)[:, None] & on
    scrambled = z * np.exp(2j * np.pi * rng.random(z.shape)) * np.repeat(bands, 16, 1)[:, :len(t)]
    apart = makeup_ratio(apart_db) * signal.istft(scrambled, SR, nperseg=128)[1][:N]
    return np.array([x + apart, x - apart])


def roll_off(x):
    return signal.sosfilt(signal.butter(12, 16990, fs=SR, output="sos"), x)


def record(dry):
    cut = signal.sosfilt(signal.butter(2, 48, "high", fs=SR, output="sos"), dry[0])
    top_edge = signal.firwin(255, 15800, window=("kaiser", 8), fs=SR)
    cut = signal.oaconvolve(cut, top_edge, "same")
    wide = filled(cut, loud_share=0.5, quiet_db=-45, apart_db=-4.5)
    return roll_off(wide)


dry = scene()
out = record(dry)
unload_audio(out)
```